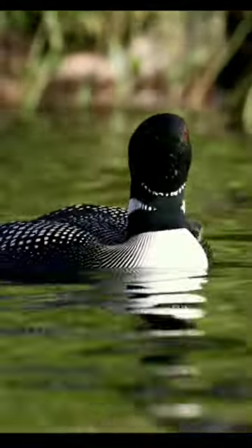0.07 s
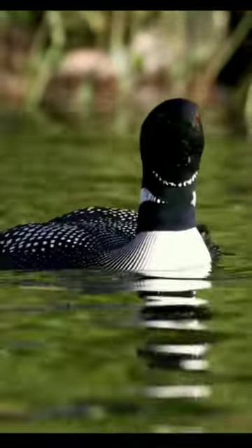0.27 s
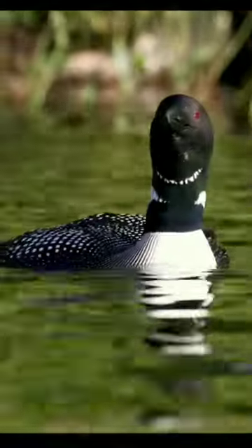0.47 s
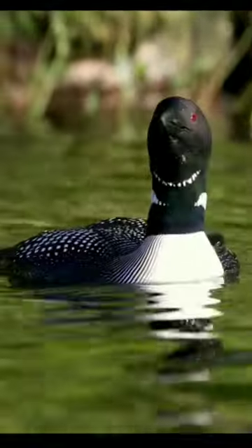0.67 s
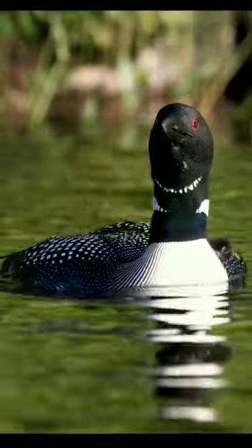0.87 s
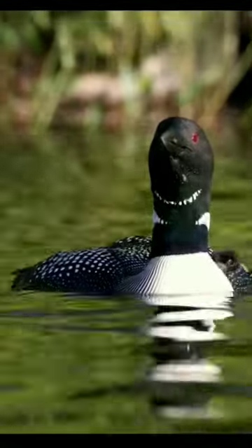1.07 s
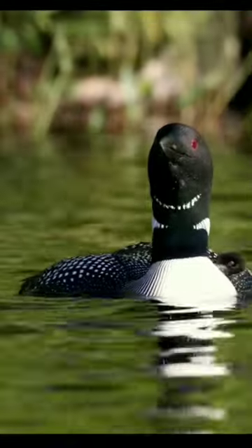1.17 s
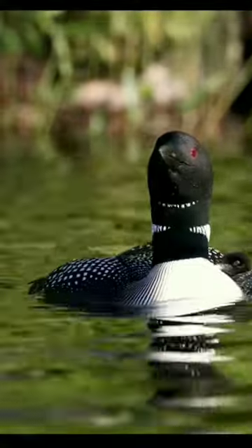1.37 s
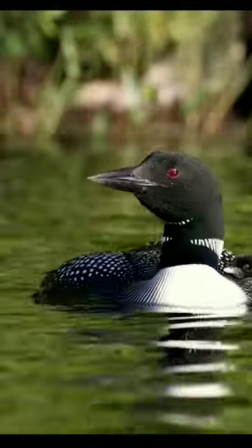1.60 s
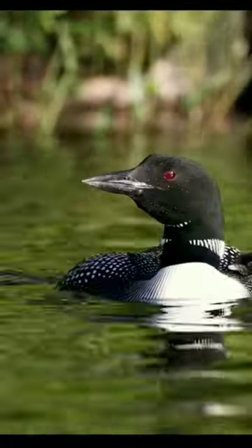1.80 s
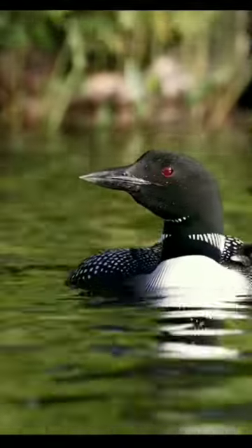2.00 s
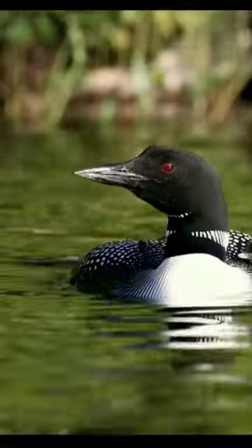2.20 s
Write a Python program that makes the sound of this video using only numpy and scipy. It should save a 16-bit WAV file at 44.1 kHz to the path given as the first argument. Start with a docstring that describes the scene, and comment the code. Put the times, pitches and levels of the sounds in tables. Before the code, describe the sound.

Close by on calm water, a loon wails once: a short rising catch, a clear low note, then a jump to a long arched tone. A faint shore echo fades over low outdoor background noise and slight lapping.

```python
"""A loon wails once, close to a single microphone on a quiet lake.
A short rising catch opens a low, almost pure note; the voice breaks upward with a brief rasp
to a long arched note and drops back as it stops. The syrinx makes the tone, the throat colours it.
The far shore returns a faint, long echo over a steady outdoor hush and a few soft laps."""
import sys
import numpy as np
from scipy import signal
from scipy.fft import rfft, irfft
from scipy.io import wavfile
from scipy.ndimage import uniform_filter1d

SR = 44100
rng = np.random.default_rng(int(sys.argv[2]) if len(sys.argv) > 2 else 0)


def master(y):
    """Save y as 16-bit WAV."""
    cut = np.clip(np.atleast_2d(y).T, -1, 1)
    pcm = np.round(cut * 32767)  # scale
    wavfile.write(sys.argv[1], SR, pcm.astype(np.int16))


N = 99225
TIME = np.arange(N) / SR

# spectrum of distant air and water: (frequency [Hz], relative level [dB])
HUSH_SPECTRUM = [(40, -22), (70, -19.5), (100, -15), (135, -9.5), (170, -3), (220, 2), (290, -2),
                 (370, -5.5), (600, -6), (1000, -8), (1300, -11.5), (1650, -16.5), (2350, -12.5),
                 (3000, -19.5), (4200, -29.5), (5400, -27.5), (7000, -33), (10000, -37.5), (15500, -43)]
# soft sounds like lapping water: (time [s], pitch [Hz], half-width [Hz], half-length [s], level [dB])
WATER_LAPS = [(.391, 1900, 450, .006, -43), (1.69, 210, 40, .025, -48), (1.865, 220, 45, .025, -42)]
# echoes from the banks: (delay [s], gain [dB])
BANK_ECHOES = [(.046, -23), (.29, -38)]
# spectrum of the rasp at the voice break: (frequency [Hz], relative level [dB])
RASP_SPECTRUM = [(1000, -25), (2000, -10), (2500, 0), (3500, -14), (4500, -5), (6000, -7), (7200, -20),
                 (10000, -16), (12000, -28), (15000, -32)]
# the four parts of the wail: (time [s], pitch [Hz], level [dB])
CATCH_CURVE = [(.16, 400, -53.5), (.172, 408, -26.5), (.19, 424.5, -24), (.21, 445, -25.5),
               (.222, 488, -29.5), (.232, 583, -42)]
LOW_CURVE = [(.226, 597, -41), (.233, 620, -26), (.24, 619.6, -15.5), (.285, 617.4, -15.5),
             (.365, 622.3, -11.5), (.46, 635.5, -11.3), (.522, 650, -9.7), (.546, 666, -11.5),
             (.553, 690, -13), (.565, 660, -28)]
HIGH_CURVE = [(.548, 770, -37), (.558, 792.3, -9), (.67, 790.5, -9.5), (.705, 798.5, -8.5),
              (.74, 808.8, -10.5), (.815, 813.4, -9.5), (.91, 820, -12), (1.05, 819.1, -11),
              (1.155, 807.8, -9), (1.195, 810.4, -11), (1.225, 805, -10.5), (1.29, 798, -12),
              (1.342, 791.6, -10), (1.372, 777.7, -13), (1.422, 772, -12.5), (1.446, 788, -18),
              (1.462, 830, -39)]
RELEASE_CURVE = [(1.442, 657, -47), (1.453, 625, -25.5), (1.47, 606, -23.5), (1.487, 585, -32),
                 (1.51, 580, -59)]
# throat colour of each part: (frequency [Hz], base overtone level against the fundamental [dB])
THROAT_CATCH = [(850, 9.5), (1280, -19), (1750, -29), (2500, -22.5), (3500, -41)]
THROAT_LOW_EARLY = [(1240, -35), (1860, -29), (2480, -21.5), (3100, -36.5), (3720, -41), (4350, -48.5),
                    (4970, -57.5), (5600, -44), (6200, -46), (6900, -67.5), (7500, -61.5), (8700, -56.5),
                    (9300, -65), (10000, -58), (11300, -67.5), (15000, -75)]
THROAT_LOW_LATE = [(1280, -30.5), (1920, -35.5), (2550, -21), (3200, -50), (3830, -54.5), (4480, -39.5),
                   (5100, -58.5), (5750, -42), (6400, -60), (7000, -69.5), (8200, -57), (9400, -68.5),
                   (10700, -55.5), (11400, -71.5), (12100, -59.5), (15000, -70)]
THROAT_HIGH_EARLY = [(1580, -39.5), (2380, -21), (3170, -38), (3960, -58.5), (4750, -54), (5540, -39.5),
                     (6330, -53.5), (7120, -66), (7900, -67), (8700, -50.5), (9500, -61), (10300, -56.5),
                     (11100, -69), (11900, -75.5), (12660, -57), (13600, -77.5), (15000, -69.5)]
THROAT_HIGH_LATE = [(1620, -35), (2430, -20), (3250, -34), (4050, -44), (4850, -54), (5650, -50),
                    (6450, -60.5), (7250, -53), (8050, -60), (8850, -62), (9700, -57), (10550, -52),
                    (11350, -73), (12200, -60), (13000, -64), (13700, -74), (14650, -59), (15500, -72)]
THROAT_RELEASE = [(1200, -26), (1800, -34), (2500, -28.5), (3500, -49)]
# brightness of the voice: (time [s], change of the main throat resonance [dB], change of the treble [dB])
VOICE_BRIGHTNESS = [(.235, -1, -9), (.3, 1, -5.5), (.38, 1, 4), (.47, 0, 0), (.53, -10.5, -11),
                    (.565, -2, -1.5), (.68, 0.5, -1), (.82, 2, -1), (.98, -0.5, 1), (1.14, -2, 2),
                    (1.3, -8, 1), (1.37, -12, -2.5), (1.41, -15, -12), (1.445, -22, -32)]

HUSH_DB, HUSH_WAVER_DB = -44.5, .62
SWELL_HZ, SWELL_WIDTH_HZ, SWELL_DB, SWELL_FADE_S = 1280, 260, -49, .35
SHORE_DB, SHORE_T60_S, ECHO_CUT_HZ = -29, 2.7, 3000
RASP_S, RASP_WIDTH_S, RASP_DB = .559, .008, -50
BREAK_S, BREAK_WIDTH_S, BREAK_JITTER = .556, .0072, .015
JITTER, JITTER_HZ, SHIMMER_DB, SHIMMER_HZ = .0018, 60, .12, 20
OVERTONE_WANDER_DB, TREBLE_WANDER_DB, WANDER_HZ = .5, 2.2, 5
RESONANCE_HZ, RESONANCE_OCTAVES, TREBLE_EDGE_HZ = 2720, .78, (4900, 4950)
RING_S, RING_WIDTH_S, RING_HZ, RING_WIDTH_HZ, RING_DB = 1.41, .07, 4680, 400, 13
LOW_CUT_HZ, HIGH_CUT_HZ = 165, 15500


def from_db(db):
    """Decibels to gain."""
    return 10 ** (np.asarray(db) / 20)


def bump(x, centre, width):
    """A bell curve of height 1."""
    return np.exp(-((x - centre) / width) ** 2)


def in_time(rows):
    """Each column of a curve at every sample."""
    times, *columns = np.transpose(rows)
    return [np.interp(TIME, times, column) for column in columns]


def at_hz(spectrum, hz):
    """Read a spectrum on a log-frequency axis."""
    frequencies, db = np.transpose(spectrum)
    return np.interp(np.log(np.maximum(hz, 1)), np.log(frequencies), db)


def coloured(gain_at):
    """Noise of unit rms with a given gain per frequency."""
    hz = np.arange(N // 2 + 1) * SR / N
    noise = irfft(rfft(rng.standard_normal(N)) * gain_at(hz), N)
    return noise / np.sqrt(np.mean(noise ** 2) + 1e-20)


def drift(rate_hz):
    """Random wander of unit rms, mostly slower than the given rate."""
    return coloured(lambda hz: (hz > 0) / (1 + (hz / rate_hz) ** 2))


def hush():
    """Steady far noise of air and water, with a soft midrange swell that dies away."""
    level = from_db(HUSH_DB + HUSH_WAVER_DB * drift(rate_hz=9.9))
    steady = coloured(lambda hz: from_db(at_hz(HUSH_SPECTRUM, hz)))
    swell = coloured(lambda hz: 1 / (1 + ((hz - SWELL_HZ) / SWELL_WIDTH_HZ) ** 2))
    return level * steady + from_db(SWELL_DB) * bump(TIME, 0, SWELL_FADE_S) * swell


def laps():
    """Brief, soft puffs of narrow noise, like water lapping."""
    water = np.zeros(N)
    for at_s, pitch, half_width, half_length, db in WATER_LAPS:
        band = coloured(lambda hz: 1 / (1 + ((hz - pitch) / half_width) ** 4))
        water += from_db(db) * bump(TIME, at_s, half_length) * band
    return water


def lake_echo(call):
    """Dull echoes from the banks and a long scattered tail from the wooded shore."""
    first_echo_s = BANK_ECHOES[0][0]
    tail = rng.standard_normal(N) * from_db(-60 * TIME / SHORE_T60_S) * (TIME > first_echo_s)
    tail /= np.sqrt(np.sum(tail ** 2))
    echoes = from_db(SHORE_DB) * signal.fftconvolve(call, tail)[:N]
    for delay, db in BANK_ECHOES:
        echoes += from_db(db) * np.interp(TIME - delay, TIME, call, left=0)
    return signal.sosfilt(signal.butter(2, ECHO_CUT_HZ, fs=SR, output="sos"), echoes)


def rasp():
    """A short burst of roughness as the voice breaks upward."""
    noise = coloured(lambda hz: from_db(at_hz(RASP_SPECTRUM, hz)))
    return from_db(RASP_DB) * bump(TIME, RASP_S, RASP_WIDTH_S) * noise


def throat_gain(hz, throat, late_throat, shift_s):
    """The throat colours one overtone, moving to its late shape, if it has one, over the span shift_s."""
    colour_db = at_hz(throat, hz)
    if late_throat is not None:
        colour_db += np.interp(TIME, shift_s, [0, 1]) * (at_hz(late_throat, hz) - colour_db)
    resonance_db, treble_db = in_time(VOICE_BRIGHTNESS)
    in_resonance = bump(np.log2(hz / RESONANCE_HZ), 0, RESONANCE_OCTAVES)
    in_treble = np.interp(hz, TREBLE_EDGE_HZ, [0, 1])
    wander_db = (OVERTONE_WANDER_DB + in_treble * TREBLE_WANDER_DB) * drift(WANDER_HZ)
    # a thin ring comes up as the call closes
    ring_db = RING_DB * bump(TIME, RING_S, RING_WIDTH_S) * bump(hz, RING_HZ, RING_WIDTH_HZ)
    return from_db(colour_db + ring_db + in_resonance * resonance_db + in_treble * treble_db + wander_db)


def syrinx(curve, throat, late_throat=None, shift_s=None, *, harmonics):
    """One register of the voice: a sine and its overtones, unsteady in pitch near the break."""
    hz, db = in_time(curve)
    breaking = bump(TIME, BREAK_S, BREAK_WIDTH_S)
    hz *= 1 + JITTER * drift(JITTER_HZ) + BREAK_JITTER * breaking * drift(rate_hz=400)
    phase = 2 * np.pi * np.cumsum(hz) / SR
    wave, power = np.sin(phase), 1
    for k in range(2, harmonics + 1):
        gain = throat_gain(k * hz, throat, late_throat, shift_s)
        wave += gain * np.sin(k * phase + rng.uniform(0, 2 * np.pi))
        power += gain ** 2
    sounding = (TIME > curve[0][0]) & (TIME < curve[-1][0])
    soft_gate = uniform_filter1d(sounding.astype(float), size=200)
    level = from_db(db + SHIMMER_DB * drift(SHIMMER_HZ))
    return soft_gate * level * wave * np.sqrt(2 / power)


def loon():
    """The bird, close by: catch, low note, high note and release run into one another."""
    catch = syrinx(CATCH_CURVE, THROAT_CATCH, harmonics=6)
    low = syrinx(LOW_CURVE, THROAT_LOW_EARLY, THROAT_LOW_LATE, shift_s=(.3, .46), harmonics=24)
    high = syrinx(HIGH_CURVE, THROAT_HIGH_EARLY, THROAT_HIGH_LATE, shift_s=(.68, .88), harmonics=19)
    release = syrinx(RELEASE_CURVE, THROAT_RELEASE, harmonics=5)
    return catch + low + high + release


def scene():
    """At the microphone, in mono: the hush and the water, the near bird and its distant echo."""
    background = hush() + laps()
    call = loon() + rasp()
    return (background + call + lake_echo(call))[None]


def record(dry):
    """A low cut takes the rumble off the microphone signal, and the top is cut steeply."""
    thinned = signal.sosfilt(signal.butter(4, LOW_CUT_HZ, "high", fs=SR, output="sos"), dry)
    return signal.sosfilt(signal.ellip(12, .1, 90, HIGH_CUT_HZ, fs=SR, output="sos"), thinned)


dry = scene()
out = record(dry)
master(out)
```